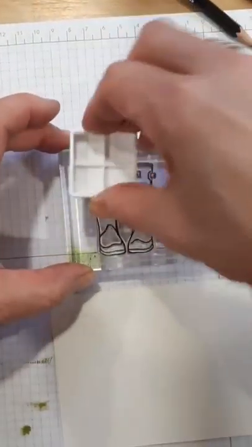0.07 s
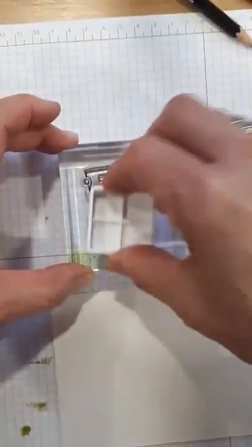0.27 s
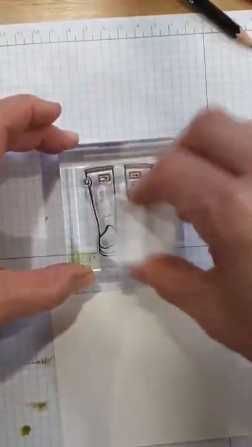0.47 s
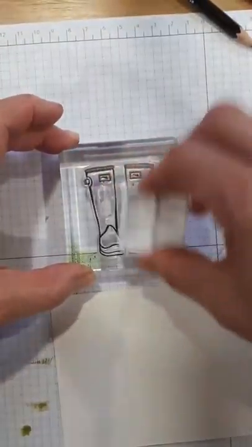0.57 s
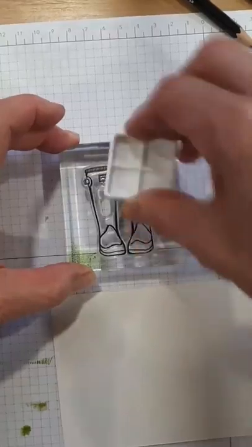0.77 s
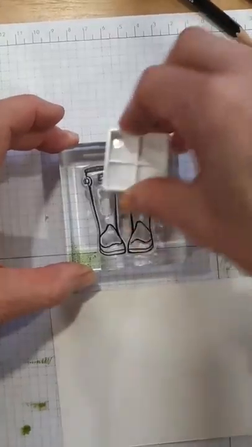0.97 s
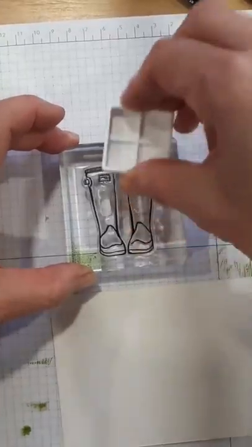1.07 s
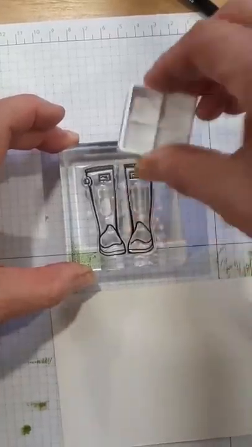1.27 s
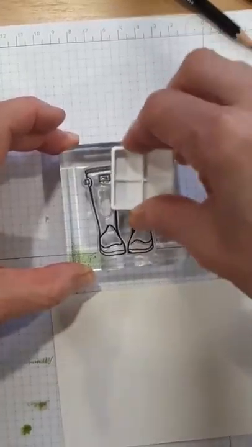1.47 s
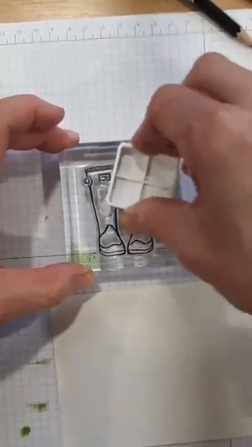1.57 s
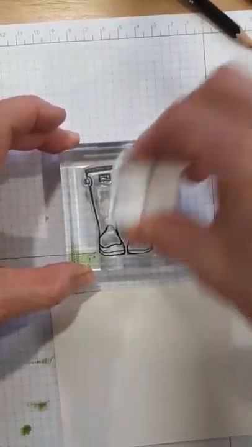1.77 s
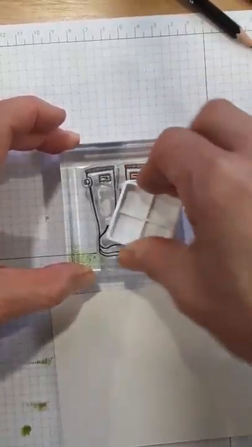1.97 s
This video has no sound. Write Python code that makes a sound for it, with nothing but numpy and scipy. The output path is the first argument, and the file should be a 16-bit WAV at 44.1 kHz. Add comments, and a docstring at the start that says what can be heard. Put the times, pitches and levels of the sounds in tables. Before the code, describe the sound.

Close up in a quiet room, a quick run of clicking, thumping taps comes from a plastic ink pad dabbed onto a stamp on a desk. The hardest taps knock the acrylic block against the desktop, and the ink crackles faintly between them. The tapping then thins to one lighter tap, the plastic ticks faintly in the fingers, and the pad is set down softly and briefly rubbed.

```python
"""At a desk in a quiet room, a small plastic ink pad is tapped onto a clear stamp on an acrylic block.
Each impact excites the normal modes of the bodies it reaches: the pad's shell clicks, the desk thumps,
and the hardest taps knock the block against the desk top. After a short dwell the pad lifts: threads of
tacky ink crackle and the block drops back. At the end the pad is set down softly and rubbed."""
import sys
import numpy as np
from scipy import signal
from scipy.fft import rfft, irfft
from scipy.io import wavfile

SR = 44100
rng = np.random.default_rng(int(sys.argv[2]) if len(sys.argv) > 2 else 0)


def digitize_waveform(pressure):
    """Quantize a signal to 16-bit integers and store it at the path in sys.argv[1].

    Rows of a 2-D input are taken as channels; values are limited to [-1, 1].
    """
    field = np.atleast_2d(pressure).T
    bounded = np.clip(field, -1, 1)
    quanta = np.round(bounded * 32767).astype(np.int16)
    wavfile.write(sys.argv[1], SR, quanta)


N = 88993

# spectrum of room tone and microphone hiss: frequency_hz, relative_density_db
AIR_SPECTRUM = [(15, 11.5), (25, -2), (120, 7.5), (175, -4), (280, -.5), (722, -11.5), (1000, -15),
                (1360, -12), (1970, -17), (2500, -23), (3830, -23), (5260, -28), (8030, -29.5),
                (14000, -25.5)]
# reverberation of the room: frequency_hz, echo_gain_db, t60_s
ROOM_BANDS = [(54.7, -15.5, 0.17), (139, -18.5, 1), (250, -0.5, 0.32), (453, -2.5, 0.32), (980, 5.5, 0.34),
              (1780, -0.5, 0.24), (3040, -8, 0.26), (7370, -3, 0.27), (14000, 1, 0.32)]
# hands shifting on the desk: start_s, level_db
HAND_BUMPS = [(1.273, -46), (1.429, -45), (1.605, -48)]
# plastic ticking as the fingers turn the pad: start_s, level_db, pitch_hz
FINGER_TICKS = [(1.7166, -63, 10200), (1.8072, -57.5, 4800), (1.8975, -56.5, 7450)]
# envelope of the pad rubbing on the stamp: time_s, level_db
RUB_ENVELOPE = [(1.90, -84), (1.953, -82.5), (1.965, -68.5), (2.02, -70.5)]
# modes of the desk top under the block: pitch_hz, gain_db, t60_s, swing_sign
DESK_MODES = [(57.3, -21.5, 0.085, -1), (99.7, -10, 0.23, 1), (119.8, -9.5, 0.4, 1),
              (134.15, 2.5, 0.13, -1), (188, -19.5, 0.34, -1), (221.2, -9.5, 0.19, 1), (268, -5, 0.05, 1),
              (366.7, -9, 0.089, -1), (445, -21.5, 0.16, 1)]
# modes of the acrylic block on the desk, damped by the fingers: pitch_hz, gain_db, t60_s, swing_sign
BLOCK_MODES = [(403, -8.5, 0.053, -1), (454.5, -6.5, 0.077, -1), (561.6, 6, 0.022, 1), (600, 2, 0.033, -1),
               (747, -14.5, 0.018, 1), (997, -17.5, 0.025, -1), (1104, -18, 0.017, 1),
               (1337, -19.5, 0.02, -1), (1610, -28.5, 0.024, 1)]
# modes of the pad's plastic shell: pitch_hz, width_hz, gain_db
SHELL_MODES = [(1274, 690, 1.5), (1680, 830, 4), (2104, 290, -7), (2780, 270, -7), (3325, 224, -11.5),
               (4170, 270, -7), (4690, 240, -10)]
# impacts of the pad on the stamp:
# start_s, thump_db, knock_db, knock_contact_ms, shell_db, shell_centre_hz, spread_ms, tack_db, rebound_db
PAD_TAPS = [(-0.105, -26, -32.5, 1.63, -68, 3020, 1.0, -66, -29.5),
            (0.0697, -25.5, -31, 2.11, -47, 4500, 0.8, -60, -36),
            (0.2742, -29, -41, 0.89, -46.5, 3070, 2.8, -59.5, -38),
            (0.4453, -27.5, -42, 0.4, -50.5, 2600, 1.8, -65, -41),
            (0.5996, -30.5, -39.5, 1.42, -54, 2470, 1.8, -70.5, -43.5),
            (0.7534, -31, -40, 0.3, -47.5, 1970, 1.37, -66.5, -43),
            (0.917, -26.5, -27.5, 0.73, -52.5, 3220, 1.3, -68, -37),
            (1.0612, -29, -42, 0.86, -50, 3500, 1.0, -78, -34),
            (1.225, -24.5, -26.5, 0.53, -39, 3700, 0.38, -74, -41),
            (1.5324, -35, -51, 0.86, -57.5, 3160, 1.1, -89, -46.5),
            (1.957, -46.5, -53, 1.4, -60, 2390, 4.7, -80, -47)]

LEAD = SR // 4   # samples before time zero: the tapping is already under way
TIME = np.arange(-LEAD, N) / SR
AGE = np.arange(SR // 2) / SR   # seconds since a contact


def from_db(db):
    """Decibels to amplitude ratio."""
    return 10 ** (np.asarray(db) / 20)


def unit_rms(x):
    """Normalisation to an rms of 1."""
    return x / np.sqrt(np.mean(x ** 2) + 1e-20)


def at_hz(table, hz, column=1):
    """Interpolation of one column on a log-frequency axis."""
    table = np.array(table)
    return np.interp(np.log(hz), np.log(table[:, 0]), table[:, column])


def add(out, start_s, sound):
    """Superposition: a sound joins the mix at start_s."""
    start = max(0, LEAD + round(start_s * SR))
    part = out[start:start + len(sound)]
    part += sound[:len(part)]


def resonance(x, hz, width_hz):
    """A damped resonator: two-pole band-pass with unit peak gain."""
    radius = np.exp(-np.pi * width_hz / SR)
    feedback = [1, -2 * radius * np.cos(2 * np.pi * hz / SR), radius ** 2]
    return signal.lfilter(np.array([1, 0, -1]) * (1 - radius ** 2) / 2, feedback, x + 1e-18)


def decay(t60_s):
    """Exponential damping: 60 dB are lost in t60_s."""
    return from_db(-60 * AGE / t60_s)


def grains(count, grain_db):
    """Surface roughness: random impulses with a log-normal scatter of size."""
    return rng.standard_normal(count) * from_db(grain_db * rng.standard_normal(count))


def micro_contacts(spread_ms, grain_db=11.5):
    """Rough surfaces meet at many points, in a quickly fading flurry of impulses."""
    return grains(len(AGE), grain_db) * np.exp(-(AGE * 1000 / (2 * spread_ms)) ** 2)


def click_at(db, click):
    """Energy normalisation: the click carries as much as one millisecond at this level."""
    return from_db(db) * click * np.sqrt(SR / 1000 / np.sum(click ** 2))


def bump(db, hz, t60_s, rise_s=0.00059):
    """A damped oscillator swells under a soft push and rings down."""
    swell = 1 - np.exp(-AGE / rise_s)
    return from_db(db) * swell * decay(t60_s) * np.sin(2 * np.pi * hz * AGE)


def snap(db, hz, width_hz, spread_ms, grain_db):
    """Resonant filtering gathers a flurry of impulses around one bright pitch."""
    flurry = resonance(micro_contacts(spread_ms, grain_db), hz, hz / 2)
    return click_at(db, resonance(flurry, hz, width_hz))


def air(level_db=-67.5):
    """Stationary noise: room rumble under a faint hiss."""
    hz = np.maximum(np.fft.rfftfreq(N, 1 / SR), 1)
    spectrum = rfft(rng.standard_normal(N)) * from_db(at_hz(AIR_SPECTRUM, hz))
    return from_db(level_db) * unit_rms(irfft(spectrum, N))


def room(x, first_echo_s=0.0017, build_s=0.0077):
    """Reverberation: a diffuse field builds after the first reflection and decays band by band."""
    edges_hz, response = np.geomspace(45, 16000, 15), 0
    build = 1 - np.exp(-np.maximum(AGE - first_echo_s, 0) / build_s)
    for low, high in zip(edges_hz, edges_hz[1:]):
        hz = np.sqrt(low * high)
        band = signal.butter(2, [low, high], "band", fs=SR, output="sos")
        noise = signal.sosfilt(band, rng.standard_normal(len(AGE)))
        echoes = noise * build * decay(at_hz(ROOM_BANDS, hz, column=2))
        echoes *= np.sqrt(2 * (high - low) / SR / np.sum(echoes ** 2))   # unit gain within the band
        response += from_db(at_hz(ROOM_BANDS, hz)) * echoes
    return signal.fftconvolve(x, response)[:len(x)]


def hand_bumps():
    """Free vibration: nudged by the hands, the desk answers with one low note."""
    out = np.zeros(len(TIME))
    for start_s, db in HAND_BUMPS:
        add(out, start_s, bump(db, hz=70, t60_s=0.12))
    return out


def finger_ticks():
    """Impulse excitation: the shell ticks under the fingers at one narrow resonance."""
    out = np.zeros(len(TIME))
    for start_s, db, hz in FINGER_TICKS:
        add(out, start_s, snap(db, hz, width_hz=0.11 * hz, spread_ms=1, grain_db=9))
    return out


def pad_rub():
    """Stick-slip friction: dense little slips drive two resonances of the shell."""
    slips, rasp = grains(len(TIME), grain_db=10.5), 0
    for hz, width_hz in [(2150, 1360), (3050, 200)]:
        rasp += resonance(resonance(slips, hz, width_hz), hz, width_hz)
    times_s, levels_db = np.transpose(RUB_ENVELOPE)
    return unit_rms(rasp) * from_db(np.interp(TIME, times_s, levels_db)) * (TIME > times_s[0])


def pad_lifts(dwell_s=0.042, rebound_s=0.049):
    """Adhesion fails after each tap: threads of ink snap, then the released block drops back."""
    out = np.zeros(len(TIME))
    for start_s, *_, tack_db, rebound_db in PAD_TAPS:
        add(out, start_s + dwell_s, snap(tack_db, hz=6030, width_hz=6200, spread_ms=8.3, grain_db=11.5))
        add(out, start_s + rebound_s, bump(rebound_db, hz=338.3, t60_s=0.038))
    return out


def rim_crack(thump_db, spread_ms, hz=7500, width_hz=5500):
    """Direct radiation from the rim's contacts: a bright snap, louder for a longer flurry."""
    db = thump_db - 42.5 + 6 * np.log2(spread_ms)
    flurry = resonance(micro_contacts(spread_ms), hz, width_hz)
    return click_at(db, resonance(flurry, hz, 2 * width_hz))


def shell_click(db, centre_hz, spread_ms, falloff_db_per_octave=10.5):
    """Selective excitation: the spot where the rim lands favours the shell modes near one pitch."""
    contacts, out = micro_contacts(spread_ms), 0
    for hz, width_hz, mode_db in SHELL_MODES:
        ring = resonance(resonance(contacts, hz, width_hz), hz, 0.32 * hz)
        octaves_away = abs(np.log2(hz / centre_hz))
        out += click_at(db + mode_db - falloff_db_per_octave * octaves_away, ring)
    return out


def struck(modes, contact_ms, detune, vary_db):
    """Modal response to one smooth push: longer contact is duller; the hand's load detunes each mode."""
    ring = 0
    for hz, db, t60_s, swing_sign in modes:
        loaded_hz = hz * (1 + detune * rng.normal())
        amplitude = swing_sign * from_db(db + vary_db * rng.normal())
        ring += amplitude * decay(t60_s) * np.cos(2 * np.pi * loaded_hz * AGE)
    push = np.sin(np.pi * np.minimum(AGE * 1000 / contact_ms, 1)) ** 2
    return signal.fftconvolve(ring, push / push.sum())[:len(AGE)]


def pad_taps(foam_contact_ms=1.41, squeeze_s=0.00157):
    """Impact: the rim cracks, the shell rings, the desk thumps; once the foam yields, the block knocks."""
    out = np.zeros(len(TIME))
    for start_s, thump_db, knock_db, knock_contact_ms, shell_db, centre_hz, spread_ms, *_ in PAD_TAPS:
        click = rim_crack(thump_db, spread_ms) + shell_click(shell_db, centre_hz, spread_ms)
        thump = from_db(thump_db) * struck(DESK_MODES, foam_contact_ms, detune=0.004, vary_db=0.2)
        knock = from_db(knock_db) * struck(BLOCK_MODES, knock_contact_ms, detune=0.015, vary_db=0.5)
        add(out, start_s, click + thump)
        add(out, start_s + squeeze_s, knock)
    return out


def scene(fine_echo_db=-5.5):
    """Close direct sound adds to the reverberant field; the fine lifts and ticks stay drier."""
    desk = pad_taps() + hand_bumps() + pad_rub()
    fine = pad_lifts() + finger_ticks()
    echoes = room(desk + from_db(fine_echo_db) * fine)
    return ((desk + fine + echoes)[LEAD:] + air())[None]


def record(dry):
    """Band limiting: a steep low-pass removes the treble above 14.1 kHz."""
    return signal.sosfilt(signal.ellip(10, .1, 70, 14100, fs=SR, output="sos"), dry)


dry = scene()
out = record(dry)
digitize_waveform(out)
```